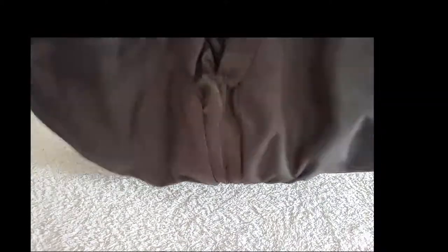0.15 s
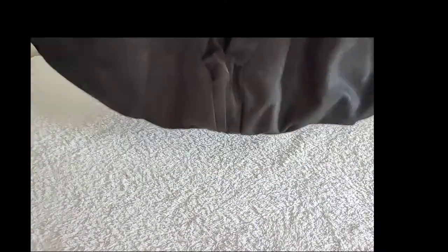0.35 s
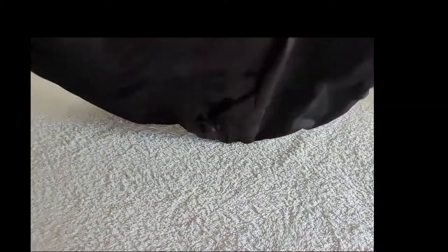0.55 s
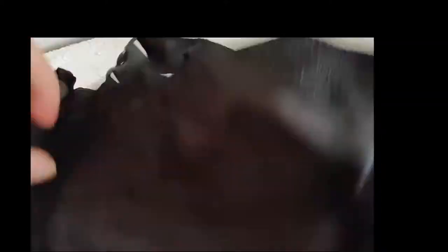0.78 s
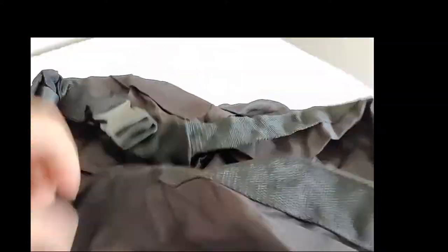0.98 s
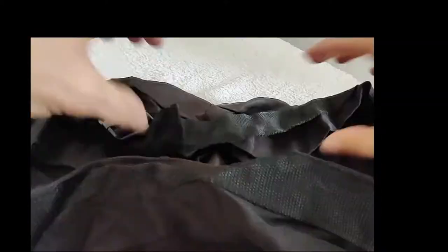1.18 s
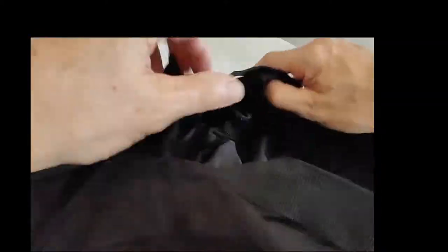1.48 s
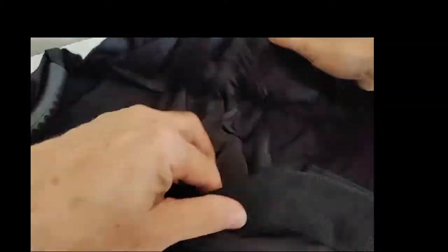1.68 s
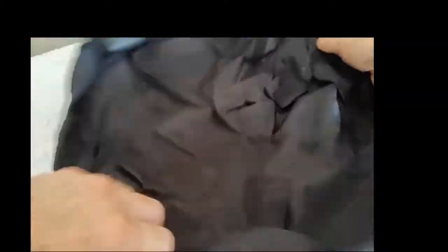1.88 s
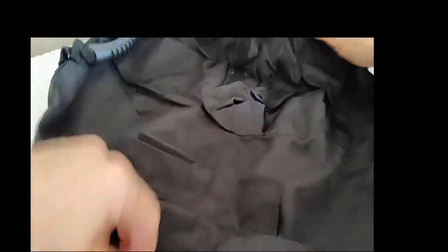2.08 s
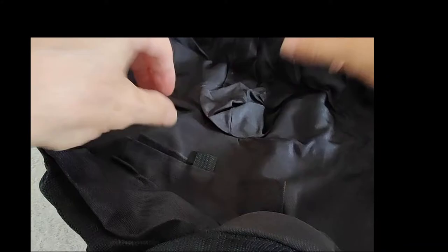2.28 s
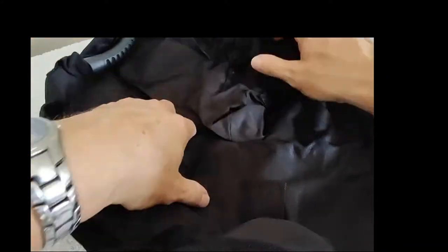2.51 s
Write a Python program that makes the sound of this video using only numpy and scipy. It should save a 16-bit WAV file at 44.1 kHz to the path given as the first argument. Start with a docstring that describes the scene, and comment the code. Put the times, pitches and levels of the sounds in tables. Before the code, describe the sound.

A nylon bag rustles close by in a small room. A brief slide at the start drops to faint brushing, with a soft flap near 0.5 s. Stronger crinkles and a fold pop at 0.8 s lead to rubbing until 1.3 s. After near silence, a pop at 1.5 s, plastic buckle clicks around 1.6-1.7 s, then the loudest crumpling near 2.1 s, fading by 2.6 s over a faint low hum-like noise.

```python
"""Nylon bag handled in a small room

A nylon bag is turned over and spread open close by: sliding weave, crinkles and flutter are coloured random slips.
Handfuls crumple as short band-passed bursts of slips; folds pop and panels flap as heavily damped swings.
Rubbed cloth and the bag's hollow sound as narrow gliding bands; a plastic buckle clicks as a noise tick plus modes.
The hands rest briefly between moves. A short diffuse room tail and a quiet, bass-heavy background lie beneath."""
import sys
import numpy as np
from scipy import signal
from scipy.fft import rfft, irfft, next_fast_len
from scipy.io import wavfile
from scipy.ndimage import uniform_filter1d, map_coordinates

SR = 44100
rng = np.random.default_rng(int(sys.argv[2]) if len(sys.argv) > 2 else 0)


def to_wav(sig):
    """Store sig (one row per channel, or 1-D mono) as 16-bit WAV at the path in sys.argv[1].

    Samples outside -1..1 are clipped; the rate is SR.
    """
    pcm = np.clip(np.atleast_2d(sig), -1, 1) * 32767
    pcm = np.round(pcm).astype(np.int16)
    wavfile.write(sys.argv[1], SR, pcm.T)  # frames by channels


N = 116865  # samples

OPPOSITE = np.array([[1], [-1]])  # left, right


def amp(db):
    """Decibels to gain."""
    return 10 ** (np.asarray(db) / 20)


def unit(x):
    """Scale to rms 1."""
    return x / np.sqrt(np.mean(x ** 2) + 1e-20)


def along(points, hz):
    """Read (f/Hz, value) points on a log frequency axis."""
    f, v = np.transpose(points)
    return np.interp(np.log(hz + 1), np.log(f + 1), v)


def wobble(knots_per_s):
    """Smooth random curve through normally distributed knots."""
    knots = rng.standard_normal(N // 20)
    return map_coordinates(knots, [np.arange(N) * knots_per_s / SR], mode="wrap")


def filtered(x, response):
    """Multiply the spectrum of x by a response of frequency."""
    m = next_fast_len(N + SR // 2)
    hz = np.fft.rfftfreq(m, 1 / SR)
    return irfft(rfft(x, m) * response(hz), m)[..., :N]


def add(track, start_s, sound):
    """Mix a sound into a track."""
    part = track[..., max(round(start_s * SR), 0):][..., :sound.shape[-1]]
    part += sound[..., :part.shape[-1]]


# left-right likeness: f/Hz, correlation
ALIKE = [(250, 0.96), (600, 0.55), (2500, 0.076), (6000, 0.041)]


def spread(pair, spectrum):
    """Colour two unrelated signals into stereo of rms 1: bass alike, treble wide."""
    def response(hz):
        turn = np.arccos(np.clip(along(ALIKE, hz), -1, 1)) / 2
        return amp(along(spectrum, hz)) * [np.cos(turn), np.sin(turn)]

    mid, side = filtered(pair, response)
    return unit(np.array([mid + side, mid - side]))


def slips(rate_hz, scatter_db, smooth_db):
    """Slips: uneven impulses at shared random instants, split over two streams, plus smooth rubbing noise."""
    size = amp(scatter_db * (2 * rng.random(N) - 1))
    struck = rng.random(N) < rate_hz / SR
    split = np.cos(2 * np.pi * (rng.random(N) + np.array([[0], [1 / 4]])))
    return unit(struck * size * split) + amp(smooth_db) * rng.standard_normal((2, N))


def shifting(x, shift_db=3):
    """Short-lived resonances of cloth changing shape: random gain per time-frequency patch."""
    z = signal.stft(x, nperseg=512)[2]
    field = rng.standard_normal(z.shape[1:])
    for axis in (0, 1):
        field = uniform_filter1d(field, size=4, axis=axis)
    return signal.istft(z * amp(shift_db * unit(field)), nperseg=512)[1][:, :N]


def pop(t, hz, rise_cycles, width_rad):
    """Heavily damped swing of cloth, slightly out of step between channels."""
    u = t * hz / rise_cycles
    swell = (u * np.exp(1 - u)) ** 2
    phase = 2 * np.pi * rng.random() + width_rad * rng.choice([-1, 1]) * OPPOSITE / 2
    return swell * np.sin(2 * np.pi * hz * t + phase)


# cloth levels before wobble: t/s, sliding hiss level/dB, crinkle level/dB, panel flutter level/dB
HANDLING = [(0,-39,-33.5,-45), (.05,-48.5,-54,-45.5), (.129,-49,-44,-44), (.22,-58,-57,-56),
            (.33,-63,-60,-68), (0.445,-56.5,-50.5,-59), (0.486,-48,-43,-35), (.55,-48,-54,-42.5),
            (.635,-56.5,-52,-51), (.72,-49,-50,-48.5), (.799,-44.5,-34.5,-34.5), (0.894,-48.5,-50,-49),
            (.954,-41.5,-36,-38), (1.02,-43,-37.5,-35.5), (1.099,-42,-45.5,-39), (1.131,-39,-38.5,-30),
            (1.203,-35.5,-32.5,-43.5), (1.285,-44.5,-39.5,-41), (1.34,-53.5,-60,-70),
            (1.42,-70.5,-74.5,-63.5), (1.502,-69.5,-67.5,-67), (1.53,-42.5,-32.5,-33.5),
            (1.645,-37,-32.5,-28), (1.69,-36,-31.5,-36.5), (1.75,-41.5,-41,-31.5), (1.87,-41,-39,-38),
            (1.98,-36.5,-34,-34.5), (2.09,-31.5,-24,-26.5), (2.17,-32,-28.5,-30.5), (2.218,-42,-39,-40),
            (2.34,-40.5,-38.5,-43), (2.449,-46,-43,-47.5), (2.57,-65.5,-60,-59), (2.65,-80,-63,-60.5)]
# sliding weave spectrum: f/Hz, relative level/dB
WEAVE = [(900, -28), (2200, 3.5), (3300, 1.5), (4700, -2.5), (7000, -0.5), (14000, -6), (16000, -8)]
# small-crease spectrum before normalising: f/Hz, relative level/dB
CRINKLE = [(200, -15), (420, -5), (620, -4.5), (920, 3.5), (1350, -3.5), (1800, -3), (4200, -24.5),
           (9000, -51)]
# panel flutter spectrum: f/Hz, relative level/dB
FLUTTER = [(20, -29), (60, 4.5), (90, -5), (150, 1.5), (300, 3.5), (480, -5.5), (800, -12.5), (2000, -74.5)]
DULL_ABOVE_HZ, BRIGHT_FROM_DB, BRIGHT_RANGE_DB = 8700, -54.5, 5


def cloth():
    """Thread slips and creases share the small jerks of the hands; panels flutter more slowly."""
    knot_s, *columns = np.transpose(HANDLING)
    hiss_db, crinkle_db, flutter_db = [np.interp(np.arange(N) / SR, knot_s, c) for c in columns]
    jerks = wobble(knots_per_s=110)
    threads = spread(slips(rate_hz=600, scatter_db=15.5, smooth_db=6.5), WEAVE)
    hiss = amp(hiss_db + 1.08 * jerks) * threads
    creases = spread(shifting(slips(rate_hz=520, scatter_db=3, smooth_db=-1)), CRINKLE)
    crinkle = amp(crinkle_db + 2.6 * jerks) * creases
    sway_db = 3.5 * wobble(knots_per_s=35.07)
    panels = spread(slips(rate_hz=200, scatter_db=5.5, smooth_db=4.0), FLUTTER)
    flutter = amp(flutter_db + sway_db) * panels
    # barely moving cloth: hiss tilts towards x1.5 below the corner, x0.5 at the top
    dull = filtered(hiss, lambda hz: 1 / (1 + (hz / DULL_ABOVE_HZ) ** 4))
    bright = 1 / (1 + np.exp((BRIGHT_FROM_DB - hiss_db) / BRIGHT_RANGE_DB))
    tilted_hiss = (.5 + .5 * bright) * hiss + (1 - bright) * dull
    return tilted_hiss + crinkle + flutter


# crumpling handfuls: t/s, length/s, level before envelope/dB, centre f/Hz
CRUMPLES = [(0.117,0.044,-39,1700), (0.255,0.0074,-42,2300), (0.394,0.03,-43,1590), (0.461,0.039,-39,1760),
            (0.482,0.0068,-25.5,1820), (0.563,.025,-37,1880), (0.787,.012,-37,1300),
            (0.947,0.041,-32.5,1510), (0.986,0.03,-33.5,1500), (1.119,0.052,-30.5,890),
            (1.196,0.033,-30,1660), (1.61,0.01,-17,1260), (1.63,0.012,-22,1700), (1.641,0.019,-21.5,960),
            (1.674,0.019,-19.5,810), (1.893,0.017,-31,1400), (1.916,0.026,-23,460), (2.02,.016,-18.5,730),
            (2.084,.016,-16.5,795), (2.108,0.021,-23.5,1180), (2.123,0.05,-30.5,1880),
            (2.239,0.01,-27.5,1380)]
CRUMPLE_ATTACK_S, CRUMPLE_HALF_WIDTH_OCTAVES = 0.0016, 0.26


def crumples():
    """Many creases give way at once: a dying burst of slips, coloured by the patch of cloth."""
    out = np.zeros((2, N))
    creases = slips(rate_hz=1800, scatter_db=4, smooth_db=-7)
    for start_s, length_s, db, hz in CRUMPLES:
        t = np.arange(int(length_s * SR)) / SR
        band_hz = hz * 2 ** (CRUMPLE_HALF_WIDTH_OCTAVES * np.array([-1, 1]))
        patch = signal.butter(1, band_hz, "bandpass", fs=SR)
        mid, side = signal.lfilter(*patch, creases[:, round(start_s * SR):][:, :len(t)])
        burst = unit(unit(mid) + unit(side) * OPPOSITE / 2)
        envelope = (1 - np.exp(-t / CRUMPLE_ATTACK_S)) * (1 - t / length_s)
        add(out, start_s, amp(db) * envelope * burst)
    return out


# folds popping through: t/s, swing envelope peak level/dB, f/Hz
FOLDS = [(0.8139,-12,1140), (1.5201,-15.5,884), (1.8435,-33,796), (1.9928,-16.5,1120), (2.019,-14.5,1120),
         (2.045,-29,965), (2.086,-9.5,1016), (2.1872,-19,805)]
FOLD_RISE_CYCLES, CRACK_DB_RE_SWING, CRACK_T60_S = 1.04, -23, 0.021


def folds():
    """A fold pops through: a damped swing with a faint noise crack."""
    out, t = np.zeros((2, N)), np.arange(SR // 50) / SR
    for start_s, db, hz in FOLDS:
        crack = amp(CRACK_DB_RE_SWING - 60 * t / CRACK_T60_S) * rng.standard_normal((2, len(t)))
        swing = pop(t, hz, FOLD_RISE_CYCLES, width_rad=0.83)
        add(out, start_s, amp(db) * (swing + crack))
    return out


# loose panels flapping: t/s, envelope peak level/dB, f/Hz
FLAPS = [(0.058,-39,84), (0.498,-26.5,238), (.784,-29.5,284), (.812,-17,234), (0.824,-25.5,169),
         (.935,-21,220), (0.95,-27,296), (1.678,-20.5,327), (1.698,-20,171), (1.845,-27,85)]


def flaps():
    """A loose panel pushes the air with a soft, heavily damped thump."""
    out, t = np.zeros((2, N)), np.arange(SR // 16) / SR
    for start_s, db, hz in FLAPS:
        add(out, start_s, amp(db) * pop(t, hz, rise_cycles=0.53, width_rad=0.29))
    return out


# rubs and bag resonances: t/s, length/s, level before envelope/dB, first f/Hz, last f/Hz
RUBS_AND_RESONANCES = [(0.568,0.046,-41,340,285), (1.622,0.041,-20,694.3,1026),
                       (1.73,0.166,-34,165.1,139.8), (1.922,0.12,-32,126.7,162)]
PITCH_SPREAD, OVERTONE_DB = .08, -15  # fraction of pitch; octave re fundamental


def rubs_and_resonances():
    """A narrow, rough band glides as the cloth tightens or the hollow changes."""
    out = np.zeros((2, N))
    for start_s, length_s, db, first_hz, last_hz in RUBS_AND_RESONANCES:
        hz = np.geomspace(first_hz, last_hz, int(length_s * SR))
        knots_per_s = PITCH_SPREAD * np.pi * hz.mean()
        drift, side, roughness = [wobble(knots_per_s)[:len(hz)] for _ in range(3)]
        phase = 2 * np.pi * np.cumsum(hz * (1 + PITCH_SPREAD * drift)) / SR
        apart = np.sqrt(np.abs(1 - along(ALIKE, hz))) * side * OPPOSITE / 2
        tone = np.sin(phase + apart) + amp(OVERTONE_DB) * np.sin(2 * (phase + apart))
        band = unit((1 + 0.6 * roughness) * tone)
        envelope = np.sin(np.linspace(0, np.pi, len(hz)))
        add(out, start_s, amp(db) * envelope * band)
    return out


# buckle and strap contacts: t/s, tick level before channel offset/dB, ring level re mode table/dB
CLICKS = [(0.994,-23,-56), (1.5963,-16,-13), (1.672,-14.5,-29.5), (1.6796,-9.5,-21)]
# buckle modes: f/Hz, relative level/dB, t60/s
BUCKLE = [(1750,-2,0.013), (3007,1.5,0.021), (5040,-12,0.018), (8300,-13,0.018), (9680,2,0.012),
          (11100,-8,0.019)]
# tick spectrum: f/Hz, relative level/dB
TICK = [(500, -25), (2000, 3.5), (4000, 3.5), (16000, -0.5)]


def buckle():
    """Hard plastic contacts: a dry noise tick and very short decaying modes."""
    rings, ticks, t = np.zeros((2, N)), np.zeros(N), np.arange(SR // 16) / SR
    contact = 1 - np.exp(-t / 0.0003)
    for start_s, tick_db, ring_db in CLICKS:
        ring = np.zeros((2, len(t)))
        for hz, db, t60_s in BUCKLE:
            phase = rng.uniform(-1.2, 0.49, (2, 1))
            ring += amp(db - 60 * t / t60_s) * np.sin(2 * np.pi * hz * t + phase)
        add(rings, start_s, amp(ring_db) * ring * contact)
        add(ticks, start_s, amp(tick_db - 60 * t / 0.011) * contact)
    noise = spread(rng.standard_normal((2, N)), TICK)
    return rings + ticks * noise * amp(OPPOSITE * 1.8)  # left louder


# room decay: f/Hz, t60/s
ROOM = [(400, 0.31), (1500, 0.46), (5000, 0.11)]
ROOM_DB, ROOM_CLICK_SEND_DB = -13.5, 2.0


def room(x):
    """Short diffuse tail of decaying noise, nearly mono in the bass."""
    hz, t, z = signal.stft(rng.standard_normal((2, SR // 2)), SR, nperseg=256)
    decay = amp(-60 * t / along(ROOM, hz)[:, None])
    z = z * decay * (1 - np.exp(-t / 0.0005))
    mid, side = z[0], z[1] * (hz / np.hypot(hz, 550))[:, None]
    tail = signal.istft(np.array([mid + side, mid - side]), SR, nperseg=256)[1]
    return signal.fftconvolve(x, tail / np.linalg.norm(tail[0]), axes=1)[:, :N]


# background spectrum before normalising: f/Hz, relative level/dB
AMBIENT = [(20, -19), (58, -1.5), (110, -25), (1000, -37), (16000, -41.5)]
AMBIENT_DB = -62.5


def background():
    """Steady, quiet, bass-heavy noise."""
    return amp(AMBIENT_DB) * spread(rng.standard_normal((2, N)), AMBIENT)


def scene():
    """Sum the bag, its buckle, the room's answer and the background."""
    bag = cloth() + crumples() + folds() + flaps() + rubs_and_resonances()
    clicks = buckle()
    reverb = amp(ROOM_DB) * room(bag + amp(ROOM_CLICK_SEND_DB) * clicks)
    return bag + clicks + reverb + background()


TOP_HZ = 16100


def record(dry):
    """Remove everything from the band limit up."""
    return filtered(dry, lambda hz: hz < TOP_HZ)


dry = scene()
out = record(dry)
to_wav(out)
```